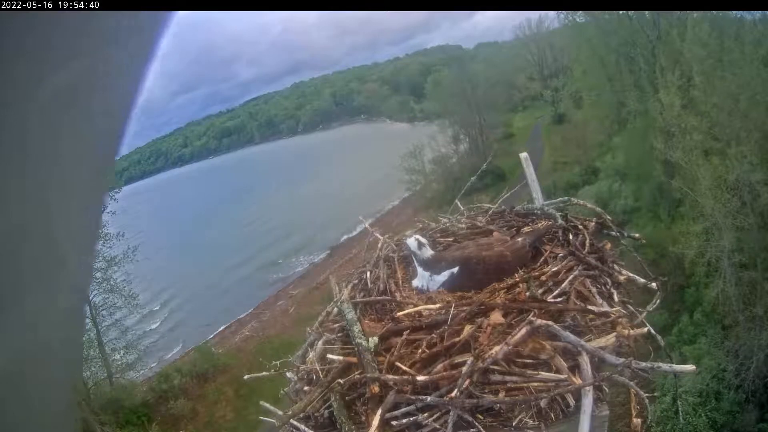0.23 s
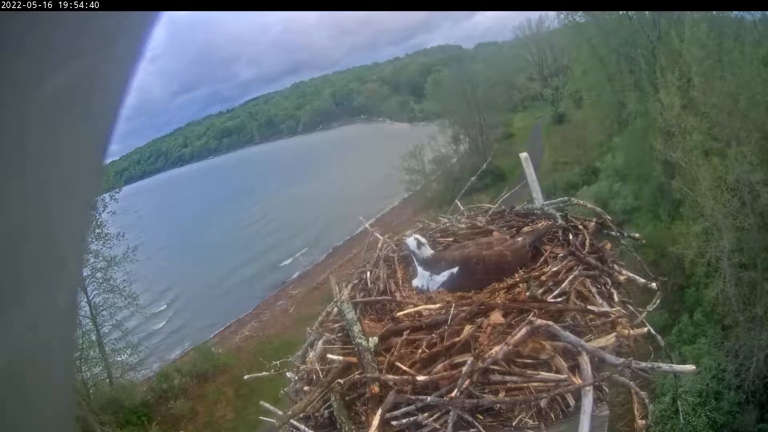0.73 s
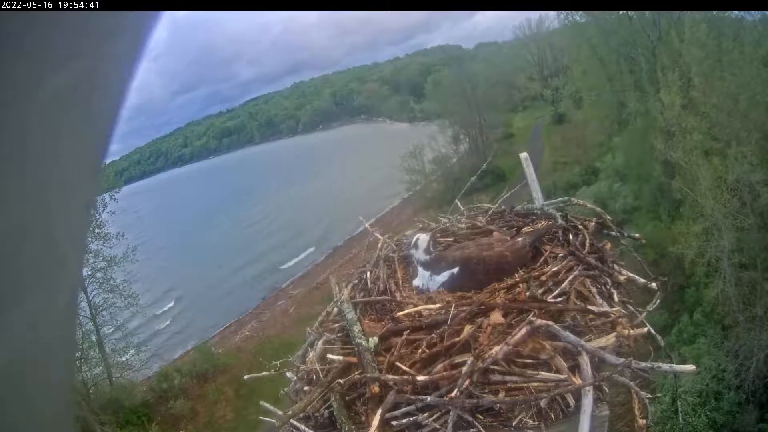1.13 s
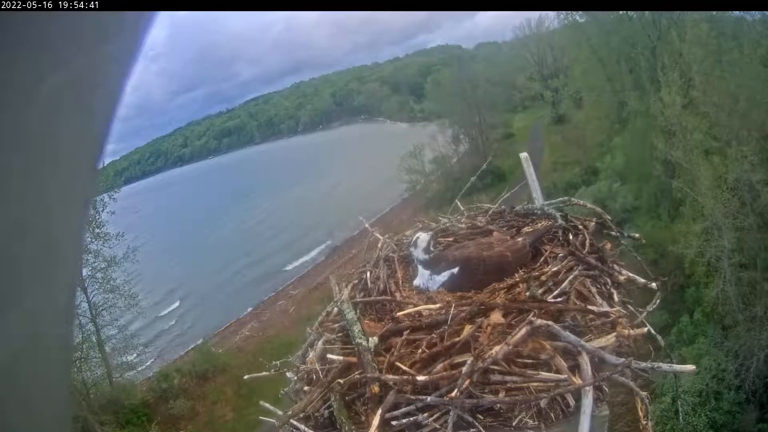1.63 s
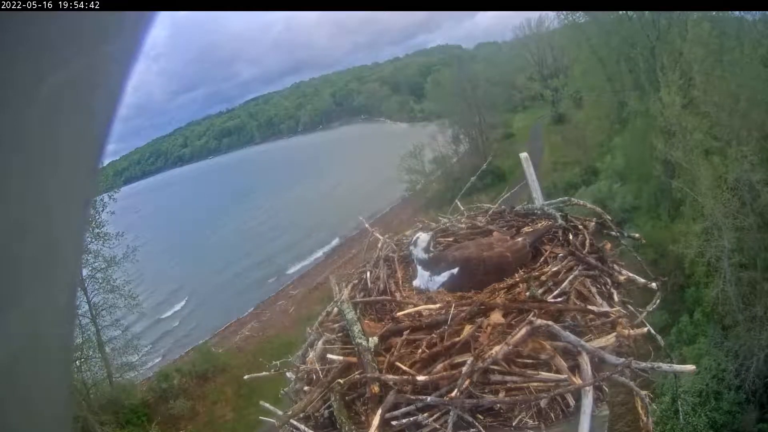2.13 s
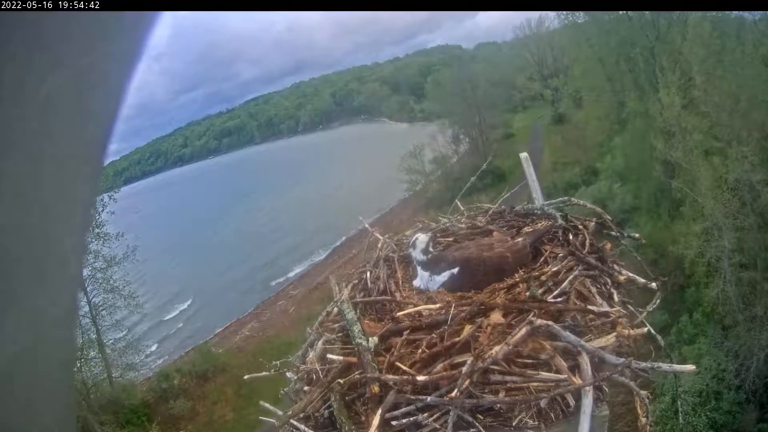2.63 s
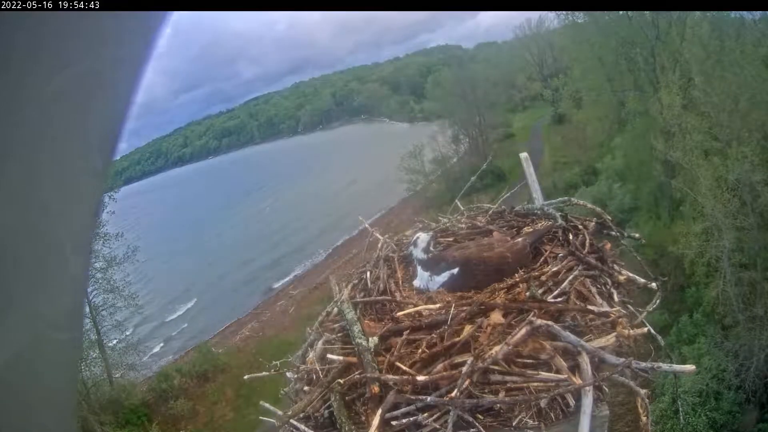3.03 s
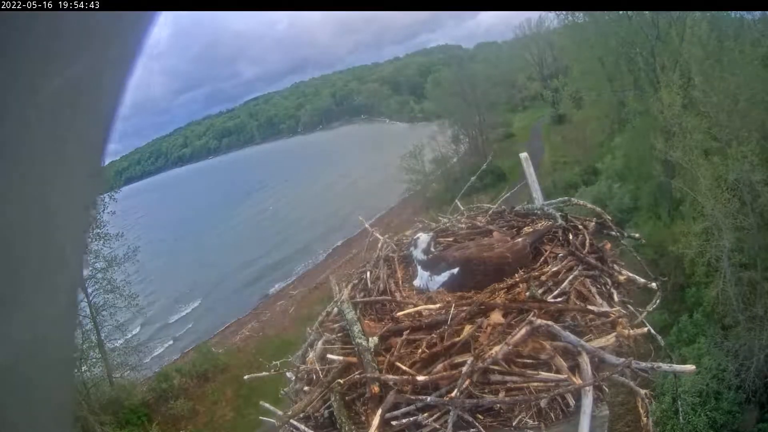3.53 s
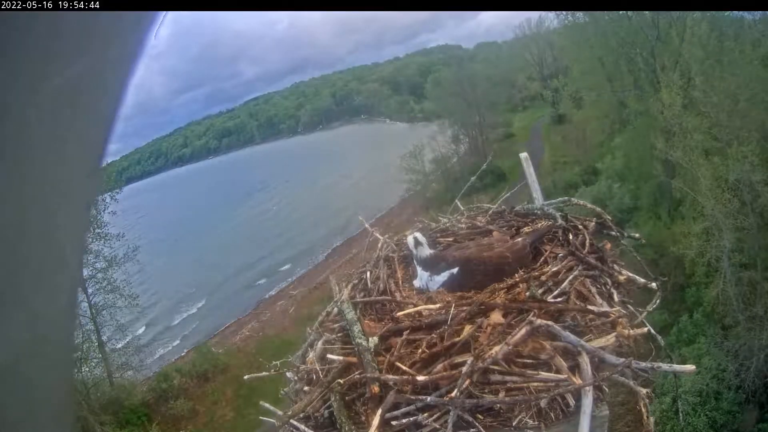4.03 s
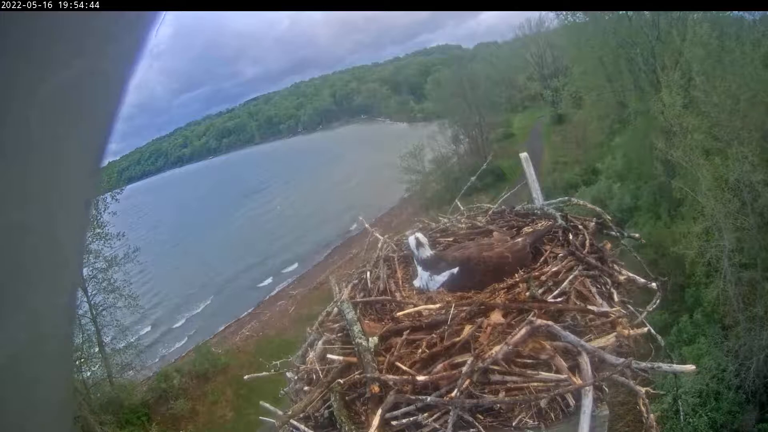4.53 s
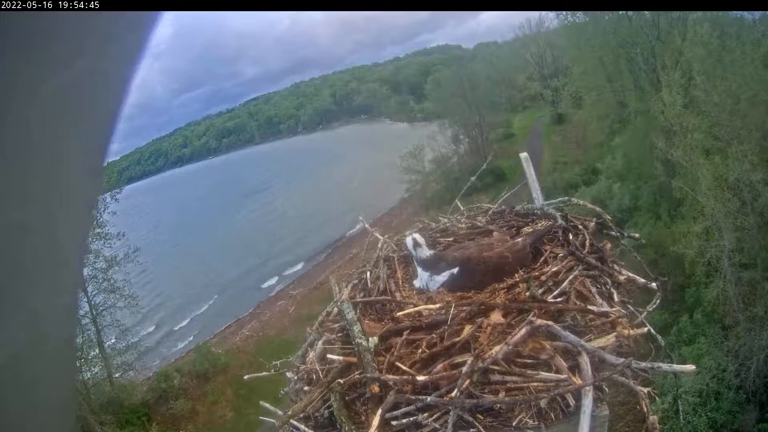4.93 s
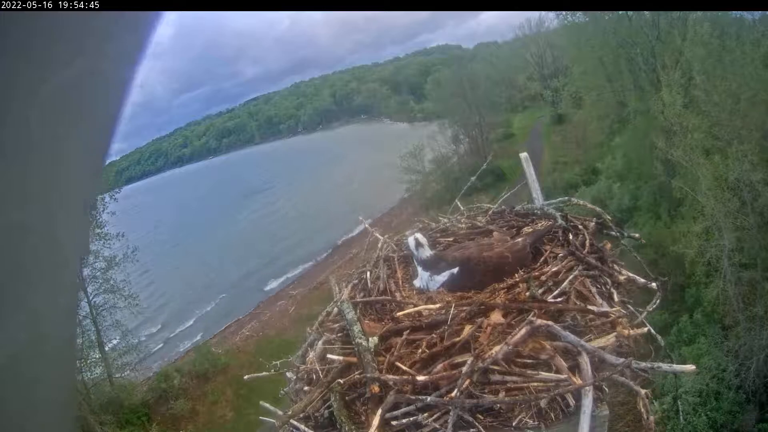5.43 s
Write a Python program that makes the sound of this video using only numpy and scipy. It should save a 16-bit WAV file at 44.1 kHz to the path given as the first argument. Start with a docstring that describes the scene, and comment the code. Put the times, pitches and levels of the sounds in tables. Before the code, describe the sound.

A large bird of prey gives six short, high falling whistles about a second apart while gusty wind thumps and rumbles on the microphone.

```python
"""Bird of prey at a windy lake shore

A large bird on its nest, close to a weatherproof microphone, gives six short falling whistles, the first
already sounding at the start: gliding tones with an octave, a twelfth, a little noise and a faint return.
Gusts rock the membrane: coloured noise makes the rumble and rattle, short pressure dips the sharp thumps.
In the distance, surf and leaves hiss steadily below: smooth noise with a slowly swelling level."""
import sys
import numpy as np
from scipy import signal
from scipy.fft import rfft, irfft, next_fast_len
from scipy.io import wavfile
from scipy.ndimage import uniform_filter1d

SR = 44100
rng = np.random.default_rng(int(sys.argv[2]) if len(sys.argv) > 2 else 0)


def log_audio(samples):
    """Write samples as a 16-bit WAV file to the path given in sys.argv[1]."""
    # one column per channel
    frames = np.atleast_2d(samples).T
    # limit to full scale, then quantise
    limited = np.clip(frames, -1, 1)
    pcm = np.round(limited * 32767).astype(np.int16)
    wavfile.write(sys.argv[1], SR, pcm)


def gain_from_decibels(decibels):
    """Convert decibel values to linear amplitude factors."""
    exponent = np.asarray(decibels, float) / 20
    return 10 ** exponent


N = 250047
T = np.arange(N) / SR

# Pitch glide of each whistle: (start [s], length [s], crest pitch [Hz], crest after start [s],
# final fall [Hz/s], onset overshoot [Hz], overshoot settling time [s])
WHISTLE_GLIDES = [(-0.015, 0.13, 2727, 0.041, 14150, 80, 0.02),
                  (0.9703, 0.14, 3226, 0.039, 15520, 1002, 0.0187),
                  (2.305, 0.16, 3740, 0.002, 11970, 1375, 0.025),
                  (3.211, 0.12, 2712, 0.033, 13500, 215, 0.008),
                  (4.109, 0.1146, 2716, 0.031, 13800, 325, 0.0109),
                  (4.991, 0.099, 2520, 0.027, 14100, 130, 0.0056)]
# Effort of each whistle, before the throat colours it: (tone level [dB], change at opening [dB],
# change at close [dB], octave re tone at opening [dB], octave re tone later [dB])
WHISTLE_EFFORT = [(-11.5, -16, -12, -12.5, -15), (-11.5, -21, 1, -17, -19.5), (-12, -28.5, -11.5, -27, -17),
                  (-12.5, -12, 5.5, -28.5, -20), (-11, -17.5, 3.5, -13.5, -16), (-9, -10, 0, -28, -16)]
# Base level of noise and roughness in each whistle; the two wide glides are noisier: (level re tone [dB])
NOISINESS = [-29, -24, -23, -30, -29, -31]
# Moments when the voice skips every other cycle: (centre [s], length [s], level re tone [dB])
PERIOD_DOUBLING_MOMENTS = [(1.003, .018, -17), (1.019, .007, -22)]
# Windpipe and open beak colour each partial as it glides: (frequency [Hz], gain [dB])
THROAT_GAIN = [(2000, -16.5), (2230, -14), (2380, -2.5), (2550, -0.5), (2750, -2.5), (2900, -9),
               (3050, -11), (3300, -3.5), (3600, 2), (3900, 4), (4300, -11.5), (4700, 3.5), (5100, -1.5),
               (5450, 9.5), (5750, 2.5), (6050, 12), (6500, 0), (7200, 1.5), (8000, -32)]
# Spectra of the noise under the whistles and of their roughness: (frequency [Hz], relative density [dB per Hz])
NOISE_SPECTRUM = [(1800, -25), (3000, -20.5), (4200, -11), (5500, -16), (6300, -8), (7000, -25.5)]
ROUGHNESS_SPECTRUM = [(60, 3.5), (500, -8.5), (1200, -22.5)]

# Buffeting of the wind on the membrane, before its random swings: (time [s], level [dB])
GUST_LEVEL = [(0.0, -23.5), (0.07, -38), (0.24, -28), (0.37, -40.5), (0.5, -23.5), (0.58, -29),
              (0.65, -18.5), (0.75, -45), (0.97, -24), (1.1, -34.5), (1.5, -38), (1.85, -44), (2.22, -45),
              (2.4, -38), (2.52, -42.5), (2.65, -36), (3.15, -34.5), (3.25, -27.5), (3.35, -37.5),
              (3.65, -35.5), (3.95, -42.5), (4.2, -35), (4.53, -31), (4.72, -39.5), (4.9, -28.5),
              (5.33, -39.5), (5.48, -24), (5.57, -43), (5.67, -38)]
# Slow heave of the pressure, before the gusts add to it: (time [s], level [dB])
SWAY_LEVEL = [(0.0, -12.5), (0.36, -16.5), (0.6, -11), (0.8, -12.5), (1.05, -5.5), (1.3, -12.5), (1.8, -14),
              (2.3, -13.5), (2.65, -10), (3.5, -12), (4.1, -12.5), (4.5, -11), (5.3, -14.5), (5.67, -11)]
# Spectra of the slow heave, the buffeting and the rattle: (frequency [Hz], relative density [dB per Hz])
HEAVE_SPECTRUM = [(4, 0), (20, 3), (40, -3), (70, -12.5), (120, -29.5), (250, -31)]
BUFFET_SPECTRUM = [(25, -16), (50, 0), (80, 0.5), (130, -8), (210, -17), (400, -26), (700, -46)]
RATTLE_SPECTRUM = [(150, -7.5), (250, 0), (450, -5), (750, -18.5)]
# Single eddies that suck at the microphone port: (time [s], depth [dB], half-width of the dip [ms])
EDDY_THUMPS = [(0.4605, -11.5, 3.1), (0.4925, -12, 3.4), (0.5255, -10.5, 2.2), (0.5545, -23, 2.1),
               (0.6368, -4, 1.94), (0.6735, -13, 3.4), (0.9548, -9, 4.8), (0.972, -13, 2.46),
               (1.0127, -12.5, 2.1), (1.2235, -17, 2.2), (2.3954, -22, 1.65), (3.2345, -9, 2.47),
               (3.2775, -14.5, 4.7), (4.155, -18, 4.3), (4.5217, -17.5, 3.3), (4.8505, -20.5, 2.3),
               (5.1589, -20.5, 2.45), (5.4676, -21.5, 4.1)]

# Spectrum of the distant surf and leaves: (frequency [Hz], relative density [dB per Hz])
SHORE_SPECTRUM = [(150, -44.5), (250, -9.5), (330, -6), (450, -9), (570, -6.5), (700, -5), (910, -11),
                  (1200, -8), (1390, -12.5), (1700, -7), (2250, -18), (3300, -21.5), (4300, -21.5),
                  (6500, -15), (9000, -3)]
# Swell of the surf and leaves, before a small ripple: (time [s], level [dB])
SURF_LEVEL = [(0.0, -38), (1.2, -38.5), (2.27, -39), (2.6, -37.5), (3.2, -37.5), (4.2, -39.5), (5.1, -38.5),
              (5.67, -38.5)]


def coloured(points):
    """Noise of rms 1 with a spectrum through (frequency [Hz], density [dB per Hz]) points."""
    size = next_fast_len(N)
    hz, db = np.transpose(points)
    f = np.maximum(np.arange(size // 2 + 1) * SR / size, 1)
    gain = gain_from_decibels(np.interp(np.log(f), np.log(hz), db, left=-80, right=-120))
    y = irfft(rfft(rng.standard_normal(size)) * gain, size)[:N]
    return y / y.std()


def walk(rate):
    """Random levels held 1 / rate s and smoothed twice over that time; spread 1."""
    hold = int(SR / rate)
    y = np.repeat(rng.standard_normal(N // hold + 1), hold)
    y = uniform_filter1d(uniform_filter1d(y, hold), hold)[:N]
    return y / y.std()


def throat(hz):
    """Gain [dB] of windpipe and open beak along a gliding partial, smoothed over 260 samples."""
    return uniform_filter1d(np.interp(hz, *np.transpose(THROAT_GAIN)), size=260, mode="nearest")


def nest_return(voice):
    """Faint sound scattered back from the nest: a decaying noise response after a short gap."""
    gap_s, level_db, t60_s = 0.004, -30, 0.4
    lag = np.arange(SR // 4) / SR
    scatter = rng.standard_normal(len(lag)) * gain_from_decibels(-60 * lag / t60_s) * (lag > gap_s)
    scatter /= np.linalg.norm(scatter)
    return gain_from_decibels(level_db) * signal.fftconvolve(voice, scatter)[:N]


def bird():
    """A nearly pure tone with its octave and twelfth, a trace of noise, and a faint return from the nest."""
    attack_s, swell_s, release_s = 0.009, 0.047, 0.024
    arch_s = 0.043  # the pitch arches over its crest, then falls steadily
    waver_db = 0.45
    roughness_db, octave_roughness_db, noise_db = -2, 8, -3  # re noisiness
    twelfth_db, twelfth_flutter_db = -23, 6
    # the octave drops out briefly, by this much per dB of noisiness above the threshold
    octave_dropout_db, dropout_from_db = 1.8, -29.5

    voice = np.zeros(N)
    waver, flutter = walk(150), walk(70)
    noise, roughness = coloured(NOISE_SPECTRUM), coloured(ROUGHNESS_SPECTRUM)
    half = np.zeros(N)
    for centre, length, db in PERIOD_DOUBLING_MOMENTS:
        half += gain_from_decibels(db) * np.exp(-((T - centre) / (length / 2)) ** 2)

    for glide, effort, noisiness_db in zip(WHISTLE_GLIDES, WHISTLE_EFFORT, NOISINESS):
        start, length, crest_hz, crest_s, fall, over_hz, settle_s = glide
        level_db, open_db, close_db, first_db, later_db = effort
        on = (T >= start) & (T <= start + length)
        u = T[on] - start
        left = length - u

        arch = np.hypot(u - crest_s, arch_s) - arch_s
        hz = crest_hz + over_hz * np.exp(-(u / settle_s) ** 2) - fall * arch
        phase = 2 * np.pi * np.cumsum(hz) / SR

        early = np.clip(1 - u / swell_s, 0, 1)
        late = np.clip(1 - left / swell_s, 0, 1)
        release = np.sin(np.pi / 2 * np.clip(left / release_s, 0, 1)) ** 2
        gate = np.clip(u / attack_s, 0, 1) * release
        db = level_db + open_db * early + close_db * late + throat(hz)

        octave_db = later_db + (first_db - later_db) * early + throat(2 * hz) - throat(hz)
        excess_db = max(noisiness_db - dropout_from_db, 0)
        octave_db -= octave_dropout_db * excess_db * np.maximum(waver[on], 0) ** 2
        # the octave is rougher than the fundamental
        octave_modulation = 1 + gain_from_decibels(noisiness_db + octave_roughness_db) * roughness[on]
        octave = gate * gain_from_decibels(octave_db) * octave_modulation * np.sin(2 * phase + 1)
        twelfth = gain_from_decibels(twelfth_db + twelfth_flutter_db * flutter[on]) * np.sin(3 * phase)
        # period doubling adds a partial at one and a half times the pitch
        doubled = half[on] * np.sin(3 * phase / 2)
        tone = np.sin(phase) + octave + twelfth + doubled
        # random modulation roughens the tone and puts noise close around each partial
        tone *= 1 + gain_from_decibels(noisiness_db + roughness_db) * roughness[on]

        # the noise under each whistle follows its level, smoothed over 2200 samples
        smooth_level = uniform_filter1d(gate * gain_from_decibels(db), size=2200, mode="constant")
        under_noise = gain_from_decibels(noisiness_db + noise_db) * smooth_level * noise[on]
        voice[on] = gate * (np.sqrt(2) * gain_from_decibels(db + waver_db * waver[on]) * tone + under_noise)
    return voice + nest_return(voice)


def wind():
    """Slow pressure heave, quicker buffeting that comes in bursts, and single sucking eddies."""
    gust_db = np.interp(T, *np.transpose(GUST_LEVEL))
    sway_db = np.interp(T, *np.transpose(SWAY_LEVEL))
    # the heave follows the gusts weakly
    heave = gain_from_decibels(sway_db + 0.38 * gust_db + 0.64 * walk(6.4)) * coloured(HEAVE_SPECTRUM)
    buffet = gain_from_decibels(gust_db + 1.57 * walk(12) + 4.3 * walk(40)) * coloured(BUFFET_SPECTRUM)
    # the harder the gust, the finer its eddies: the rattle grows faster than the buffeting
    rattle = gain_from_decibels(1.53 * gust_db - 9.5 + 5.1 * walk(60)) * coloured(RATTLE_SPECTRUM)
    pressure = heave + buffet + rattle
    for time, depth_db, half_width_ms in EDDY_THUMPS:
        u = (T - time) * 1000 / half_width_ms
        # a sharp pressure dip with a rebound on either side
        pressure -= gain_from_decibels(depth_db) * (1 - u ** 2) * np.exp(-u ** 2 / 2)
    return pressure


def shore():
    """Distant surf and leaves: many small sources merge into a smooth hiss that swells slowly."""
    ripple_db = 0.4 * walk(8)
    swell_db = np.interp(T, *np.transpose(SURF_LEVEL))
    return gain_from_decibels(swell_db + ripple_db) * coloured(SHORE_SPECTRUM)


def scene():
    """Bird, wind and shore at one microphone."""
    return (bird() + wind() + shore())[None]


def band_limit(x):
    """A steep low-pass at the top of the band."""
    return signal.sosfilt(signal.butter(12, 9150, fs=SR, output="sos"), x)


def record(dry):
    """A narrow microphone path: rounded peaks, a steep top cut and a small constant offset."""
    rounded = np.tanh(0.84 * dry) / 0.75
    top_cut = signal.cheby2(6, 60, 9400, fs=SR, output="sos")  # 60 dB down from 9400 Hz
    mix = signal.sosfilt(top_cut, rounded) + 0.0135
    return band_limit(mix)


dry = scene()
out = record(dry)
log_audio(out)
```